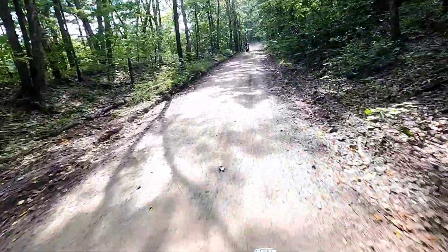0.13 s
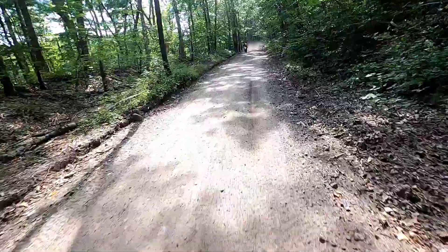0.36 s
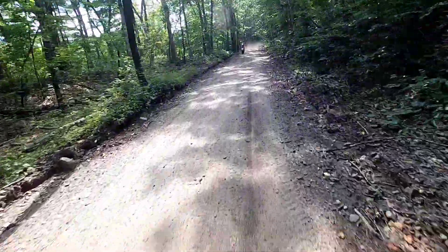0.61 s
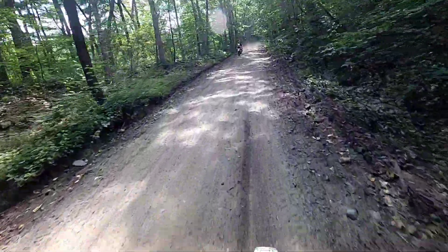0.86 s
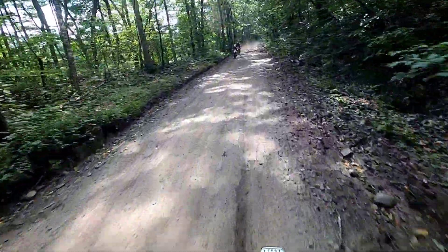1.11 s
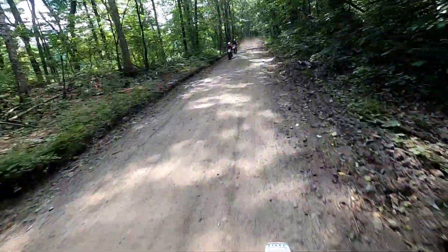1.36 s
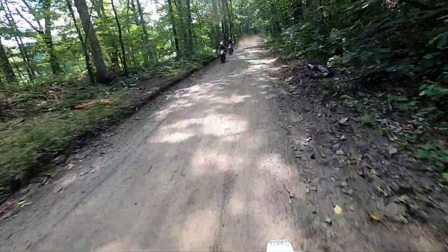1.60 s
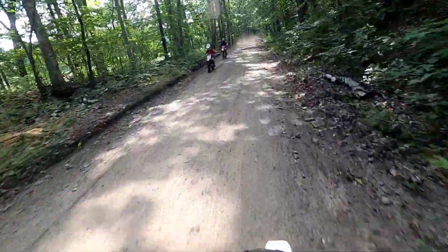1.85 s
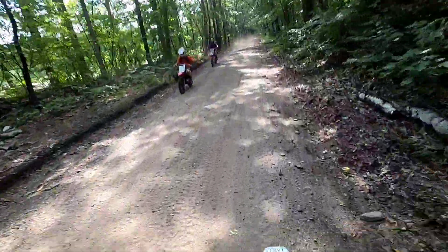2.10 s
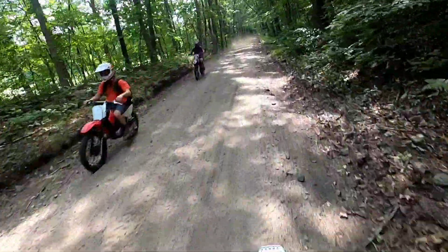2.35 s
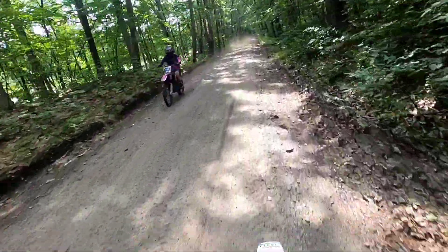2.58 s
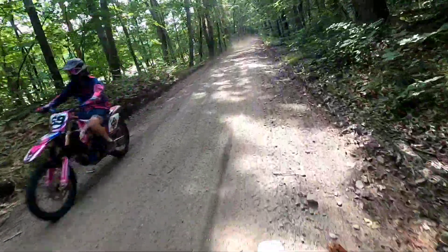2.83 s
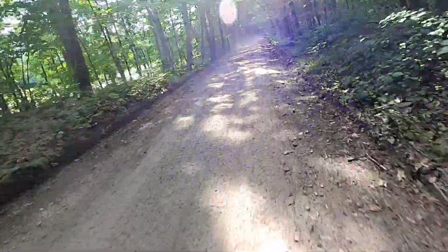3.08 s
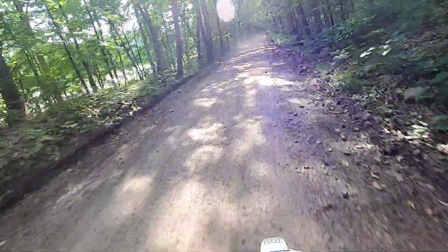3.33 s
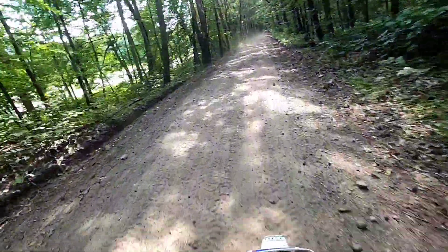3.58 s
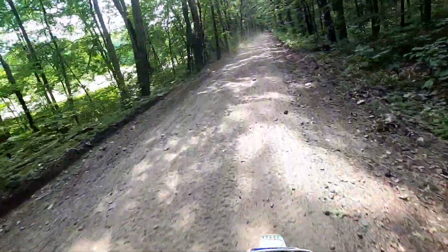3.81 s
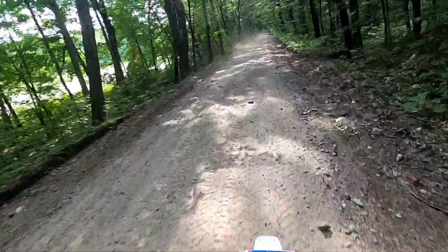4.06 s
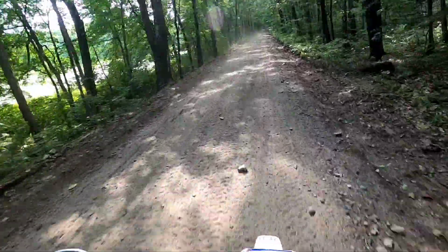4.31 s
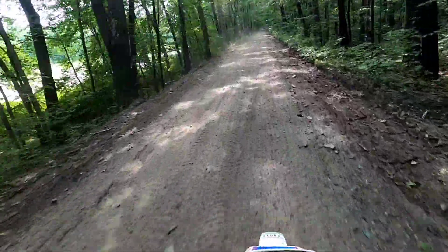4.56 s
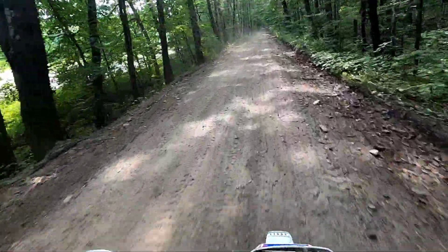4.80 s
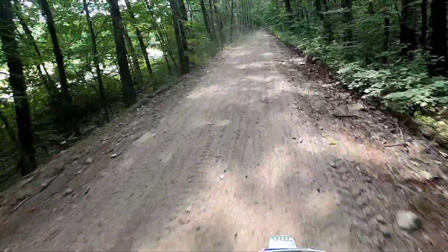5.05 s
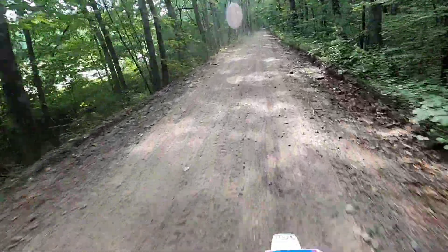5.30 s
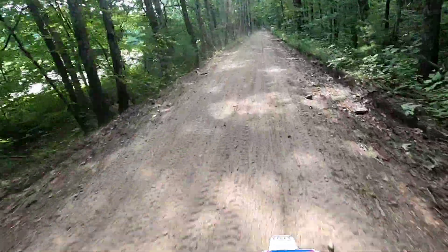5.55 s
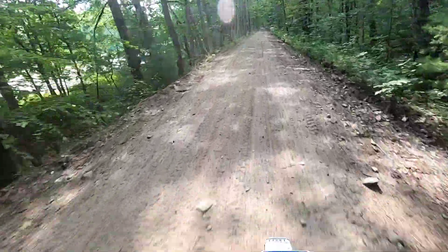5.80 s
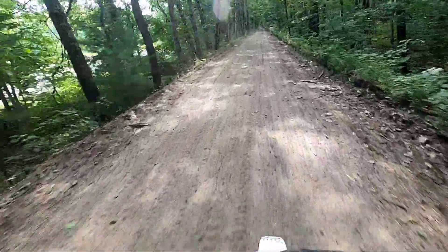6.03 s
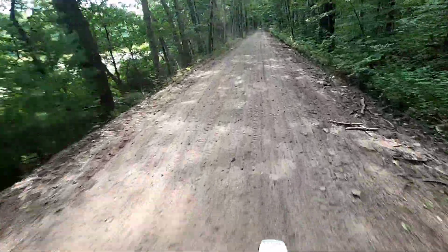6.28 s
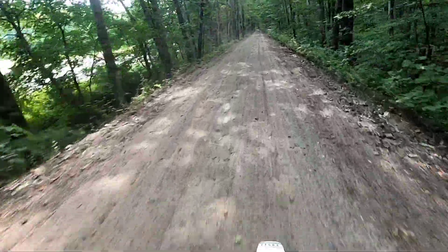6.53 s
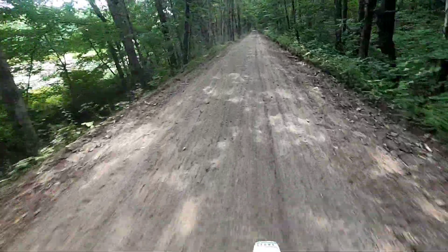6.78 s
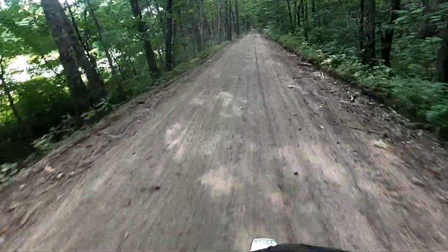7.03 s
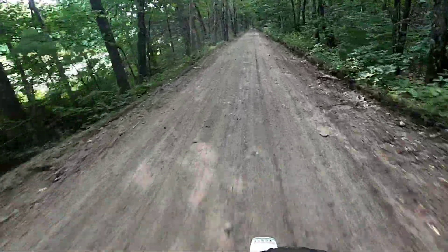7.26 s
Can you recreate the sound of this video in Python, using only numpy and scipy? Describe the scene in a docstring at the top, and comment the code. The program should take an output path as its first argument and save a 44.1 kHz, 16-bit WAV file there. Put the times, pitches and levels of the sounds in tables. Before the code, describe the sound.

Heard from the rider, a small dirt bike thrums and clatters through wind and tyre hiss, meets two passing bikes, then changes gear.

```python
"""A small single-cylinder four-stroke on a dirt trail in the woods, microphone on the rider.
From the start its firings ring the air box, wind buffets the microphone, and tyres and chain hiss.
The revs sink with the throttle shut, then recover; loose parts clatter under light load.
Two oncoming bikes pass at about 2.6 and 3.1 s, with falling pitch and bright fizz, over a low drone.
At about 5 s the throttle shuts for a gear change, a second drone slides down, and the revs climb again."""
import sys
import numpy as np
from scipy import signal
from scipy.fft import rfft, irfft, next_fast_len
from scipy.io import wavfile
from scipy.ndimage import uniform_filter1d

SR = 44100
rng = np.random.default_rng(int(sys.argv[2]) if len(sys.argv) > 2 else 0)


def transcribe(u):
    """Save the signal u as a 16-bit wav file named by the first command-line argument.

    u: samples, shape (n,) or (channels, n), limited to [-1, 1]; the rate is SR.
    q: integer samples, one column per channel.
    """
    v = np.clip(np.atleast_2d(u).T, -1, 1)
    q = np.round(v * 32767).astype(np.int16)
    wavfile.write(sys.argv[1], SR, q)


def invert_db(level):
    """Linear amplitude ratio for a level in decibels (20 dB per decade), elementwise."""
    return 10 ** (np.asarray(level, dtype=float) / 20)


N = 325899
TIME = np.arange(N) / SR
# hiss of tyres, chain and valve gear: start_s, level_db
ROAD_LEVELS = [(0, -34), (.74, -36.5), (1.3, -38), (1.46, -33), (2.5, -35.5), (3.3, -32.5), (3.81, -39),
               (4.55, -33), (4.75, -33), (4.92, -32.5), (5.2, -32.5), (5.3, -33), (5.4, -35.5), (6.4, -40),
               (7.16, -36.5), (7.39, -39.5)]


def evened(x):
    """Normalisation: scales a signal to an rms of 1."""
    return x / np.sqrt(np.mean(x ** 2) + 1e-20)


def steady(x):
    """Automatic levelling: divides a signal by its rms over 0.2 s."""
    return x / np.sqrt(uniform_filter1d(x ** 2, size=SR // 5) + 1e-12)


def read(points, hz):
    """Spectral interpolation: reads a curve of (Hz, value) on a logarithmic pitch scale."""
    f, value = np.transpose(points)
    return np.interp(np.log(hz + 1), np.log(f + 1), value)


def curves(rows):
    """Envelope interpolation: draws each column after the first against time."""
    s, *columns = np.transpose(rows)
    return [np.interp(TIME, s, column) for column in columns]


def span(start, end, ramp_s):
    """Linear gating: rises to 1 around start and falls to 0 around end."""
    return np.clip(np.minimum(TIME - start, end - TIME) / ramp_s + .5, 0, 1)


def drift(rate_hz):
    """Band-limited fluctuation: rms 1, joining rate_hz random values a second by straight lines."""
    knots = rng.standard_normal(1200)
    return np.interp(TIME * rate_hz, np.arange(1200), knots) * np.sqrt(1.5)


def ring(x, modes, moving_hz=None):
    """Modal superposition: zero-phase resonances (Hz, width Hz at -12 dB, dB); moving_hz retunes the first."""
    size, out, gain = next_fast_len(N), np.zeros(N), 0
    hz_axis = np.fft.rfftfreq(size, 1 / SR)
    for k, (hz, width, db) in enumerate(modes):
        r = np.exp(-np.pi * width / SR)
        if k == 0 and moving_hz is not None:
            # shift the note to 0 Hz, smooth forwards and backwards, shift it back
            turn = np.exp(2j * np.pi * np.cumsum(moving_hz) / SR)
            smooth = [[1 - r, 0, 0, 1, -r, 0]] * 2
            forward = signal.sosfilt(smooth, x / turn)
            both_ways = signal.sosfilt(smooth, forward[::-1])[::-1]
            out = invert_db(db) * (turn * both_ways).real
        else:
            slope = (1 - r) ** 2 / (1 - 2 * r * np.cos(2 * np.pi * (hz_axis - hz) / SR) + r ** 2)
            gain = gain + .5 * invert_db(db) * slope ** 2
    return out + irfft(rfft(x, size) * gain, size)[:N]


def coloured(colour, tilt=None, patchy_db=2.0, size=1024):
    """Spectral shaping: random short-time spectra with drifting patches; tilt is dB per octave above 2 kHz."""
    frames, hz = 4 * N // size + 5, np.fft.rfftfreq(size, 1 / SR)
    real, imaginary, patches = rng.standard_normal((frames, len(hz), 3)).T
    patches = uniform_filter1d(patches, size=10, axis=0)
    patches = evened(uniform_filter1d(patches, size=10, axis=1))
    field_db = read(colour, hz)[:, None] + patchy_db * patches
    if tilt is not None:
        at = np.minimum(np.arange(frames) * size // 4, N - 1)
        field_db = field_db + np.log2(np.maximum(hz, 2000) / 2000)[:, None] * tilt[at]
    spectra = (real + 1j * imaginary) * invert_db(field_db)
    return evened(signal.istft(spectra, nperseg=size, noverlap=3 * size // 4)[1][:N])


def dispersed(x, spread_s):
    """Dispersion: each band is delayed by its own random time, which smears sharp pulses."""
    size = next_fast_len(N + SR // 10)
    hz = np.fft.rfftfreq(size, 1 / SR)
    delay = spread_s * np.interp(hz, np.arange(300) * 90, rng.random(300))
    # phase is the running sum of group delay over frequency
    return irfft(rfft(x, size) * np.exp(-2j * np.pi * np.cumsum(delay) * hz[1]), size)[:N]


def firings(rate, rough, uneven_db, valve=0., firing_s=0.):
    """Impulsive excitation: a pulse and a gas puff a cycle, plus a valve pulse; one firing falls on firing_s."""
    jitter, valve_lead = .004, .44  # rms share of the rate; share of a cycle before the next firing
    cycles = np.cumsum(rate * (1 + jitter * drift(20))) / SR
    cycles = cycles + 1 - cycles[round(firing_s * SR)] % 1
    strength = invert_db(uneven_db * rng.standard_normal(400))[cycles.astype(int)]
    pulses = np.diff(np.floor(cycles), prepend=0)
    pulses = pulses + valve * np.diff(np.floor(cycles + valve_lead), prepend=0)
    pulses[0] = 0
    puffs = (.5 + np.exp(-(cycles % 1) / .5)) * rng.standard_normal(N) * strength
    return (1 - rough) * evened(pulses * strength) + rough * evened(puffs), cycles


def air_box(drive, cycles, level_db, over, coasting):
    """Cavity resonance: firings ring the box, whose note swings each cycle and is low and even when coasting."""
    # resonances: pitch_hz (the first is replaced by the moving note), width_hz, level_db
    box_modes = [(292, 73.3, 1), (511, 25, -34), (1613, 74, -35)]
    # intake pipe, which sings out as the revs climb: pitch_hz, width_hz, level_db
    intake_modes = [(359, 86, -13.5), (512, 48, -26)]
    cruise_hz, hz_per_rate, swing_hz, shut_hz = 290, .8, 25.7, 250
    open_hz = cruise_hz + hz_per_rate * over + swing_hz * np.sin(2 * np.pi * cycles) + 0.87 * drift(15)
    note_hz = open_hz + coasting * (shut_hz - open_hz)
    intake_gain = (1 - coasting) * invert_db(0.77 * over)  # dB per firing/s
    return invert_db(level_db) * steady(ring(drive, box_modes, note_hz) + intake_gain * ring(drive, intake_modes))


def snarl(smeared, over):
    """Formant filtering: the hard edge of the exhaust grows with the revs."""
    # resonances: pitch_hz, width_hz, level_db
    snarl_modes = [(620, 300, -4), (810, 260, 0), (1350, 700, -9)]
    cruise_db, db_per_rate = -48, 1.3
    return invert_db(cruise_db + db_per_rate * over) * steady(ring(smeared, snarl_modes))


def gear_whine(smeared, rate, coasting):
    """Order tracking: under load a resonance follows a fixed multiple of the firing rate."""
    order, full_db, full_rate, db_per_rate = 28.0, -45, 41.5, 3  # full level from 41.5 firings/s up
    whine_db = full_db + db_per_rate * np.minimum(rate - full_rate, 0)
    return (1 - coasting) * invert_db(whine_db) * steady(ring(smeared, [(1200, 160, 0)], order * rate))


def exhaust_thump(cycles, coasting):
    """Harmonic synthesis: low orders of the firing rate waver in level."""
    # orders: rate_multiple, loaded_db, coasting_change_db
    low_orders = [(1, -44, -3.5), (2, -27, 2), (3, -45.5, 17), (4, -32.5, -4.5), (5, -44, 2)]
    thump = 0
    for k, loaded_db, change_db in low_orders:
        order_level = invert_db(loaded_db + coasting * change_db + 1.5 * drift(8.1))
        thump = thump + order_level * np.sin(2 * np.pi * (k * cycles + rng.random()))
    return np.sqrt(2) * thump  # the levels are rms


def engine():
    """Source and filter: one train of firings excites air box, exhaust and gears."""
    # own engine speed: start_s, firings_per_s
    revs = [(0, 40.8), (.23, 35.3), (.39, 31.6), (.56, 30.1), (.78, 26.4), (.93, 29.2), (1.1, 37.9),
            (1.2, 37.1), (1.26, 34.2), (1.4, 33.1), (1.95, 33.0), (2.38, 33.5), (2.72, 33.8), (2.93, 35.4),
            (3.32, 36.9), (3.47, 37.5), (3.97, 40.2), (4.4, 42.1), (4.66, 43.0), (4.92, 43.9), (4.97, 43.6),
            (5.03, 41.9), (5.16, 40.1), (5.24, 42.6), (5.4, 34.4), (5.476, 34.0), (5.6, 34.8), (5.73, 34.3),
            (5.81, 34.9), (5.93, 35.2), (6.0, 35.2), (6.13, 35.7), (6.6, 36.9), (7.09, 37.6), (7.21, 38.0),
            (7.29, 37.8), (7.39, 38.2)]
    # air box level: start_s, level_db
    box_levels = [(0, -38), (.8, -25), (.95, -18), (1.07, -16), (1.12, -19), (1.17, -18.5), (1.23, -18),
                  (1.32, -15), (1.38, -27.5), (1.65, -18.5), (2.06, -18.5), (2.34, -16), (2.76, -20.5),
                  (2.86, -16.5), (4.16, -14.5), (4.73, -17.5), (4.9, -15.5), (4.98, -23), (5.03, -18),
                  (5.18, -15), (5.28, -21.5), (5.43, -15), (7.39, -15.5)]
    # throttle shut: start_s, end_s
    shut_spans = [(-1, .88), (1.12, 1.23), (4.97, 5.33)]
    # gas noise at full load: start_s, noise_share
    rough_rows = [(0, .03), (1.35, .03), (1.45, .16), (2.6, .12), (3, .04), (5.3, .04), (5.5, .15),
                  (6, .22), (6.9, .22), (7.39, .18)]
    full_db, rough_per_db = -17, .03  # gas noise takes over as the engine eases off
    valve_rate, valve_per_rate, valve_most = 36.2, .15, .35  # the valve pulse grows above 36.2 firings/s
    rate, level_db = curves(revs)[0], curves(box_levels)[0]
    coasting = np.clip(sum(span(start, end, .04) for start, end in shut_spans), 0, 1)
    over = rate - 33  # firings/s above cruising
    rough = np.clip(curves(rough_rows)[0] + rough_per_db * np.maximum(full_db - level_db, 0), 0, 1)
    valve = np.clip(valve_per_rate * (rate - valve_rate), 0, valve_most) * (1 - coasting)
    drive, cycles = firings(rate, rough, 0.17, valve, firing_s=.0205)
    smeared = dispersed(drive, .014)
    box = air_box(drive, cycles, level_db, over, coasting)
    metal = snarl(smeared, over) + gear_whine(smeared, rate, coasting)
    return box + metal + exhaust_thump(cycles, coasting), cycles


def wind():
    """Turbulent pressure: lumpy low noise buffets the microphone."""
    # buffeting: start_s, level_db
    wind_levels = [(0.0, -17.5), (0.12, -17), (1.5, -18), (2.42, -18), (3.37, -17), (3.9, -19),
                   (4.29, -16.5), (4.9, -18.5), (5.05, -16.5), (5.4, -18.5), (5.6, -18), (6.87, -21.5),
                   (7.3, -14.5)]
    # spectrum: pitch_hz, relative_db_per_hz
    wind_colour = [(10, -48), (20, -14), (40, -8), (70, -7.5), (130, -3), (200, -9.5), (300, -5.5),
                   (450, -20), (800, -29), (1200, -54), (2000, -100)]
    return invert_db(curves(wind_levels)[0] + 1.0 * drift(23)) * coloured(wind_colour, patchy_db=0.5, size=2048)


def road(cycles):
    """Amplitude modulation: broad hiss throbs once and twice a firing, swells or dips briefly, dulls when loud."""
    # spectrum: pitch_hz, relative_db_per_hz
    road_colour = [(240, -38), (400, -15.5), (439, -2), (515, -21), (557, -27), (807, -19), (985, -18),
                   (1170, -15), (1450, -24), (1650, -17.5), (3760, -26.5), (4290, -28), (6220, -41),
                   (8540, -45), (9500, -61.5), (12400, -95), (20900, -120)]
    # brief swells and dips of the hiss, some as the first bike passes: centre_s, change_db
    swells = [(0.188, 3), (.84, 6), (.99, 2.5), (1.18, 1), (2.545, 4), (2.609, 4.5), (2.68, -4.5),
              (3.01, 6.5), (3.131, 3.5), (3.2, 3.5), (5.134, 4), (5.285, 1)]
    swell_s, mean_db = 0.017, -36.5
    bright, dull_per_db = 0.73, 0.44  # dB per octave above 2 kHz, and its loss per dB of level
    level_db = curves(ROAD_LEVELS)[0]
    level_db = level_db + sum(change * np.exp(-((TIME - s) / swell_s) ** 2) for s, change in swells)
    tilt = bright - dull_per_db * (level_db - mean_db)
    throb = 1 + 0.16 * np.cos(2 * np.pi * cycles) + 0.028 * np.cos(4 * np.pi * cycles + 1.0)
    hiss = coloured(road_colour, tilt + .6 * drift(12), patchy_db=1.0)
    return invert_db(level_db + 0.35 * drift(13)) * throb * hiss


def clatter(cycles):
    """Modal excitation: noisy knocks twice a cycle ring the engine's metal, louder under light load."""
    # metal: pitch_hz, width_hz, level_db
    metal_modes = [(1520, 210, -11), (1637, 87, 6), (1870, 1500, 9.5), (2270, 84, 9.5), (2486, 270, 9),
                   (3200, 1200, 1), (3254, 180, 2), (4210, 950, -1.5), (5300, 1800, -9.5)]
    # loose parts clatter while the load is light: start_s, end_s, level_db (added to the floor)
    light_load = [(1.134, 1.27, -39.5), (1.372, 2.691, -41.5), (4.69, 4.732, -44), (4.975, 5.103, -42),
                  (5.098, 5.17, -40), (5.175, 5.25, -44.5), (5.245, 5.326, -39.5)]
    floor_db, ramp_s = -48, 0.046
    knocks = (0.64 + np.exp(-(2 * cycles % 1) / 0.54)) * rng.standard_normal(N)
    loudness = invert_db(floor_db) + sum(invert_db(db) * span(start, end, ramp_s) for start, end, db in light_load)
    return loudness * invert_db(2.0 * drift(21)) * evened(ring(knocks, metal_modes))


def fizz(level_db, doublings):
    """Distance attenuation: flickering hiss of grit and chain, and a short roar of tyres at the closest point."""
    # grit and chain: pitch_hz, relative_db_per_hz
    grit_colour = [(1500, -20), (3500, -5.5), (6000, 0), (8500, 2), (10500, -4), (11500, -13.5),
                   (12500, -38)]
    # knobbly tyres going by: pitch_hz, relative_db_per_hz
    tyre_colour = [(600, -30.5), (1200, -6), (2500, -3), (3800, -1.5), (5600, -11), (9000, -40)]
    grit_fall, tyre_fall, tyre_db = 8, 19.5, 10.5  # dB per doubling of distance (two), dB above the grit
    grit = invert_db(2.2 * drift(14) - grit_fall * doublings) * coloured(grit_colour, patchy_db=2.0)
    tyres = invert_db(tyre_db + 1.5 * drift(32) - tyre_fall * doublings) * coloured(tyre_colour, patchy_db=2.0)
    return invert_db(level_db) * (grit + tyres)


def oncoming(bike, pipe):
    """Doppler effect: a passing bike's pitch falls; its fizz follows distance and its rasp lingers behind."""
    # exhaust: pitch_hz (the first is replaced by the moving note), width_hz, level_db
    pipe_modes = [(484.5, 126, 10.5), (135.6, 29, 10.5)]
    # rasp: pitch_hz, width_hz, level_db
    rasp_modes = [(663, 350, 2), (870, 220, 2)]
    # upper part of the rasp: pitch_hz, width_hz, level_db
    edge_modes = [(1240, 670, -8), (2200, 1200, -12), (3700, 1500, -27)]
    closing_m_per_s, gap_m, sound_m_per_s = 12, 2.1, 343
    pipe_behind_m = .35  # the exhaust passes after the front wheel
    ahead_fall, behind_fall = 8, 6.5  # dB per doubling of distance
    closest_s, rate, fizz_db, rasp_db, edge_db, firing_s = bike
    front_m = closing_m_per_s * (TIME - closest_s)
    doublings = np.log2(np.hypot(front_m, gap_m) / gap_m)
    along = front_m - pipe_behind_m
    distance = np.hypot(along, gap_m)
    doppler = 1 - closing_m_per_s / sound_m_per_s * along / distance
    drive, cycles = firings(rate * doppler, .2, 2.5, firing_s=firing_s)
    fall_db = np.where(along < 0, ahead_fall, behind_fall) * np.log2(distance / gap_m)
    body = ring(dispersed(drive, .002), rasp_modes)
    edge = invert_db(edge_db) * ring(dispersed(drive, .004), edge_modes)
    rasp = invert_db(rasp_db - fall_db) * steady(body + edge)
    level_db, note_hz = curves(pipe)
    heard = span(pipe[0][0], pipe[-1][0], 0.043)
    exhaust = heard * invert_db(level_db) * steady(ring(drive, pipe_modes, note_hz))
    bite = 0.62 + .8 * np.exp(-(cycles % 1) / 0.36)  # the fizz bites on each firing
    return exhaust + rasp, bite * fizz(fizz_db, doublings)


def drone(rows):
    """Frequency modulation: a low sine wavers slightly in pitch and level."""
    hz, level_db = curves(rows)
    heard = span(rows[0][0], rows[-1][0], .04) * invert_db(level_db + 1.0 * drift(5.3))
    return np.sqrt(2) * heard * np.sin(2 * np.pi * np.cumsum(hz * (1 + 0.013 * drift(15))) / SR)


def stereo_side(mid, fizzes):
    """Stereo widening: faint hiss and delayed copies, to be added in opposite sign to the two channels."""
    hiss_db, lag_db, fizz_db = -34, -45, -13.5  # relative to the road hiss, the whole sound, the fizz's slope
    hiss = coloured([(100, -28.0), (3000, -13.5), (7000, -6.5), (9500, -15.5), (12000, -48.0)])
    side = invert_db(hiss_db + curves(ROAD_LEVELS)[0] + 3.0 * drift(9)) * hiss
    side = side + invert_db(lag_db) * np.roll(mid, shift=SR // 50)
    return side + invert_db(fizz_db) * np.roll(np.diff(fizzes, prepend=0), shift=SR // 70)


def scene():
    """Superposition: the sources add, and the side signal enters the two channels in opposite sign."""
    # oncoming bikes: closest_s, firings_per_s, fizz_db, rasp_db, edge_db (over the rasp), one_firing_s
    bikes = [(2.632, 45.0, -43, -32.5, -3, 2.779), (3.07, 44.4, -51.5, -36.5, 8.5, 3.391)]
    # their exhaust, one table a bike, with a shifting note: start_s, level_db, pitch_hz
    pipes = [
        [(1.9, -44, 510), (2.004, -33, 520), (2.22, -25.5, 486), (2.29, -30, 450), (2.38, -30, 460),
         (2.47, -23, 470), (2.516, -40, 463), (2.56, -28.5, 510), (2.66, -24, 512), (2.744, -21.5, 460),
         (2.81, -22.5, 505), (2.95, -35, 466)],
        [(3.05, -32, 470), (3.204, -21, 462), (3.268, -20, 450), (3.288, -32, 450), (3.332, -26, 500.5),
         (3.4, -29, 486), (3.6, -30, 447)],
    ]
    # drones, while the bikes pass and through the gear change: start_s, pitch_hz, level_db
    drone_tables = [
        [(2.3, 140, -34), (2.4, 139, -20), (2.64, 135, -31), (2.9, 135.4, -31), (3.0, 148, -24),
         (3.38, 145.3, -19), (3.6, 148.3, -26.5), (3.8, 150, -24)],
        [(4.98, 123.5, -41), (5.03, 125.4, -22), (5.1, 123.7, -26), (5.17, 104.1, -16), (5.23, 112, -20),
         (5.3, 92.8, -23.5), (5.37, 80, -30), (5.48, 70.3, -25), (5.55, 70.4, -32)],
    ]
    own, cycles = engine()
    background = wind() + road(cycles) + clatter(cycles)
    notes, fizzes = np.sum(list(map(oncoming, bikes, pipes)), axis=0)
    mid = own + background + notes + fizzes + sum(map(drone, drone_tables))
    side = stereo_side(mid, fizzes)
    return np.array([mid + side, mid - side])


def gated(x):
    """Spectral gating: each treble band is shut in the frames where it is too faint."""
    gate_hz, gate_db, db_per_khz = 6800, -83, -.5  # bands from 6800 Hz up; the threshold falls with pitch
    bins = 16  # in a band
    hz, _, z = signal.stft(x, SR, nperseg=1024, noverlap=512)
    band = np.arange(len(hz)) // bins
    power = np.add.reduceat((abs(z) ** 2).mean(0), np.arange(0, len(hz), bins), axis=0)[band] / bins
    edge_hz = hz[band * bins][:, None]
    threshold = invert_db(gate_db + db_per_khz * (edge_hz - gate_hz) / 1000) ** 2
    shut = (power < threshold) & (edge_hz > gate_hz)
    return signal.istft(z * ~shut, SR, nperseg=1024, noverlap=512)[1][:, :N]


def top_cut(x):
    """Nothing passes above the cut-off."""
    return signal.sosfilt(signal.butter(12, 11530, fs=SR, output="sos"), x)


def record(dry):
    """Saturation: the microphone overloads softly, and faint treble bands drop out here and there."""
    overloaded = 0.69 * np.tanh(dry / 0.71)
    mix = gated(overloaded)
    return top_cut(mix)


dry = scene()
out = record(dry)
transcribe(out)
```